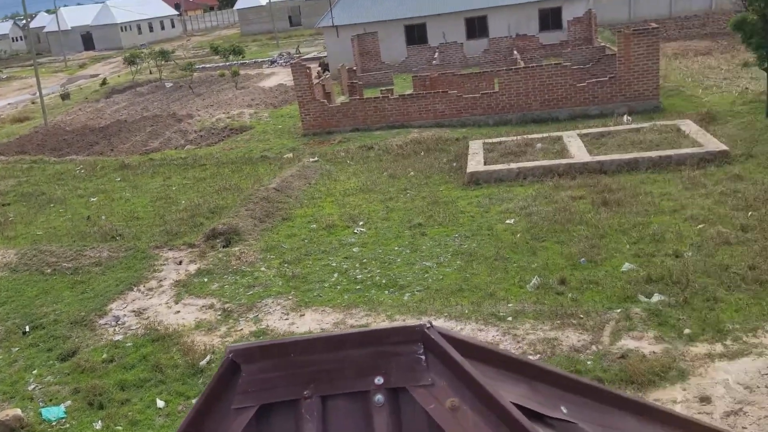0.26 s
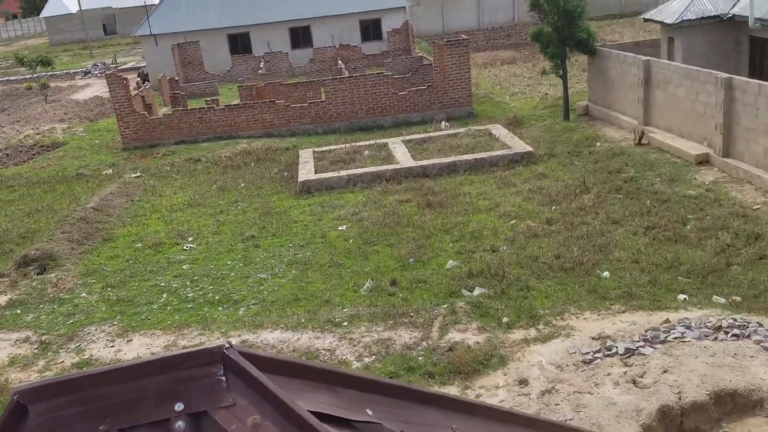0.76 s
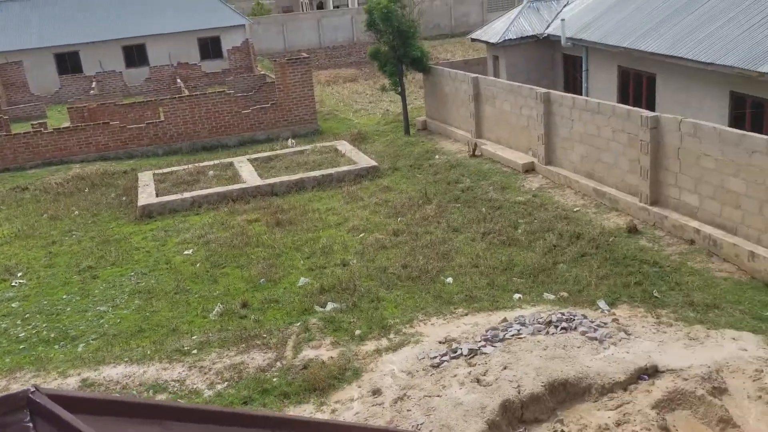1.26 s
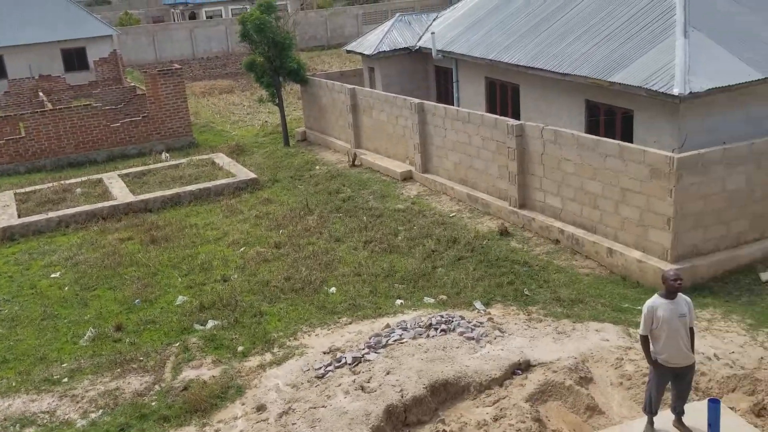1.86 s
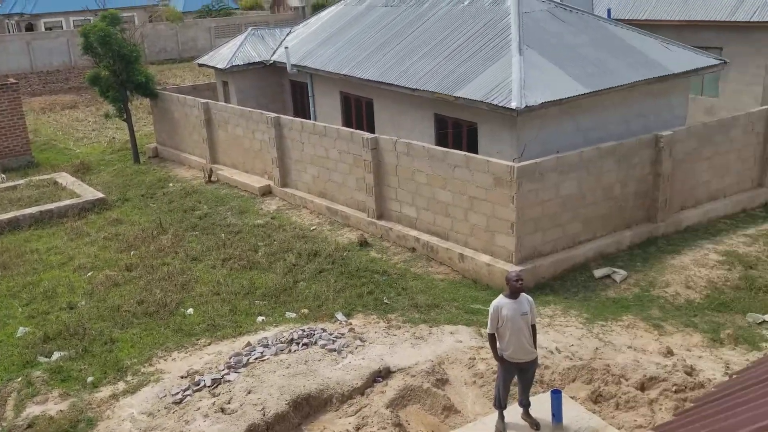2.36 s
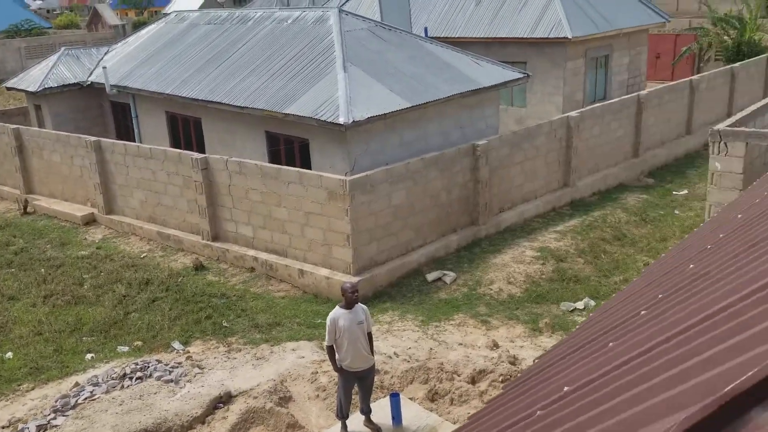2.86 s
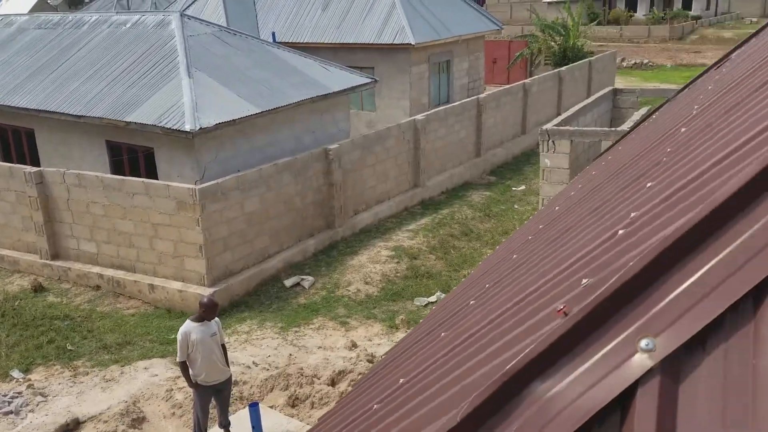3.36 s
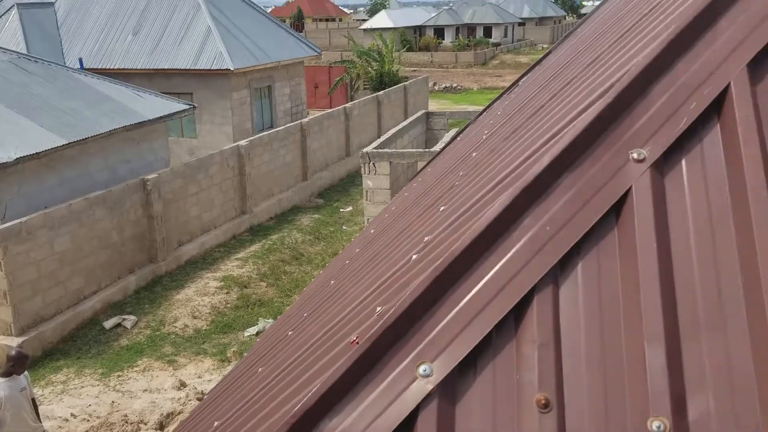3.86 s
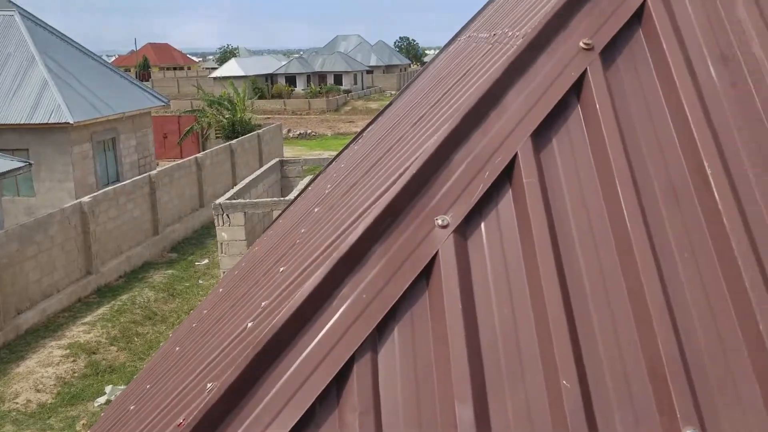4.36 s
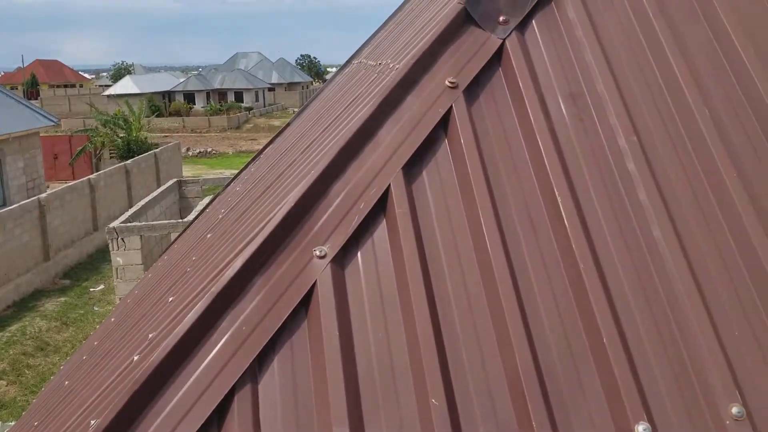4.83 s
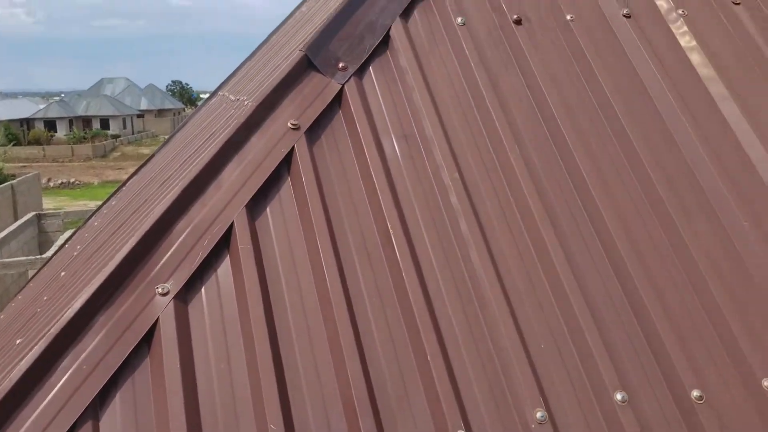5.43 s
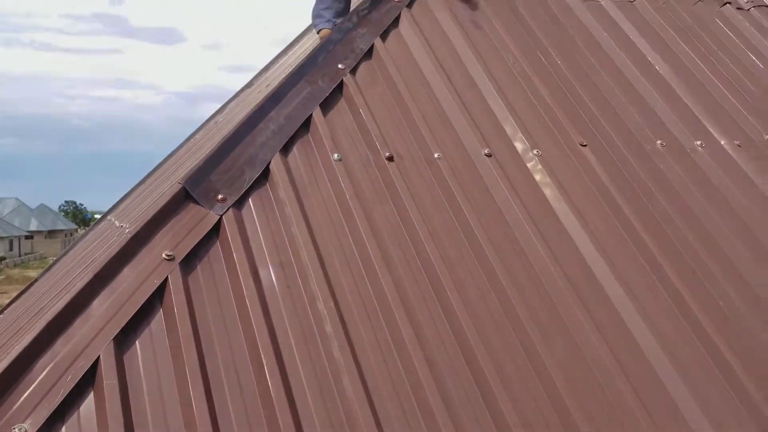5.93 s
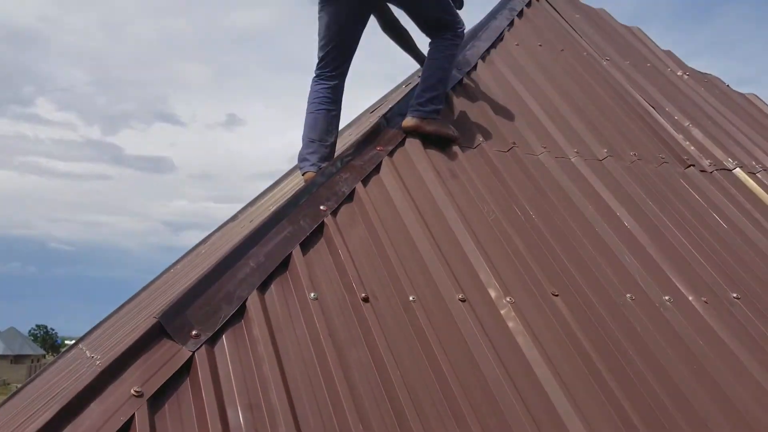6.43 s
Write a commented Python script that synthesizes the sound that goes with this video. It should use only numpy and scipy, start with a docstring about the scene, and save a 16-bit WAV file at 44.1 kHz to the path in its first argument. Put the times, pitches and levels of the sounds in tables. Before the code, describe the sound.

Wind rumbles and pops at the microphone, then steady booming blows ring through a corrugated metal roof, growing close and loud, with brief bird chirps.

```python
"""A gust rumbles and pops on the left port of a hand-held phone while small birds chirp over a quiet plain.
Regular blows (a boot or a hammer) boom through ribbed steel roof sheets, first from the far slope, then close by.
Shaped noise bands make the ringing sheets, the treble dying first; decaying modes make the humming bays, the
dented patches and the ribs. Filtered noise and damped swings make the gust, gliding near-sines the birds."""
import sys
import numpy as np
from scipy import signal
from scipy.fft import irfft, next_fast_len
from scipy.io import wavfile
from scipy.ndimage import uniform_filter1d

SR = 44100
rng = np.random.default_rng(int(sys.argv[2]) if len(sys.argv) > 2 else 0)


def ratio_of_db(decibels):
    """Turn decibels (scalar or array-like) into linear amplitude factors; 0 dB maps to 1."""
    return 10 ** (np.asarray(decibels, float) / 20)


def wrap_up_sound(samples):
    """Save the sound to the file named by the first command line argument, as 16-bit audio."""
    columns = np.atleast_2d(samples).T
    # keep every value between -1 and 1, then stretch to whole-number steps
    tamed = np.clip(columns, -1, 1)
    steps = np.round(tamed * 32767).astype(np.int16)
    wavfile.write(sys.argv[1], SR, steps)


N = 295055
T = np.arange(N) / SR
BANDS_HZ = 28 * 2 ** np.arange(0, 9.3, 1 / 3)

# The blows on the roof; boom and clang are relative to the strength:
# (time [s], strength [dB], boom [dB], clang [dB], ring length [factor])
BLOWS = [(-0.1, -29.5, -9.5, -14, 2.57), (0.651, -33, -58, -11, 0.54), (0.703, -21, -41, -19, 1.45),
         (1.032, -25, -32, -8, 1.32), (1.395, -24.5, -45, -15.5, 1.41), (1.736, -21, -21, -15.5, 1.62),
         (2.133, -17.5, -22.5, -18, 1.71), (2.631, -11.5, -18.5, -15.5, 1.484),
         (3.15, -12, -11.5, -6, 1.146), (3.194, -11, -5.5, -7.5, 0.86), (3.661, -11.5, -11.5, -3, 1.053),
         (4.176, -12, -13.5, -3.5, 0.96), (4.661, -12.5, -14.5, -5.5, 1.036),
         (5.115, -13.5, -14.5, -5, 1.1), (5.582, -13.5, -13, -3, 1.03), (6.077, -12.5, -13, -2.5, 1.03)]


def at(table, hz, column=1):
    """A table column read on a log-frequency axis."""
    table = np.array(table, float)
    return np.interp(np.log(hz), np.log(table[:, 0]), table[:, column])


def walk(rate):
    """A wandering random level: values held for 1 / rate seconds, then slewed twice; spread near 1."""
    hold = int(SR / rate)
    steps = np.repeat(rng.standard_normal(N // hold + 1), hold)
    return 1.3 * uniform_filter1d(uniform_filter1d(steps, hold), hold)[:N]


def ring(x, hz, t60):
    """One decaying mode struck by x; peak near 1 for a unit impulse."""
    pole = np.exp(2j * np.pi * hz / SR - np.log(1000) / (t60 * SR))
    return signal.lfilter([1], [1, -pole], x).imag


def band_noise(hz):
    """Unit-rms noise a third of an octave wide, alike at both ports as far as they are close for that wavelength."""
    # likeness of the two ports: (frequency [Hz], correlation of left and right)
    port_likeness = [(60, .96), (130, .98), (290, .97), (640, .8), (1200, .5), (2200, .2), (3500, 0),
                     (15000, 0)]
    size = next_fast_len(N)
    f = np.arange(size // 2 + 1) * SR / size
    near = np.flatnonzero(np.abs(np.log2((f + 1) / hz)) < 1 / 3)
    like = np.clip(at(port_likeness, hz), -0.98, 0.98)
    taper = np.cos(1.5 * np.pi * np.log2(f[near] / hz))
    mid, side = rng.standard_normal((2, len(near), 2)) @ np.array([1, 1j]) * taper
    both = np.zeros((2, len(f)), complex)
    both[:, near] = np.sqrt(1 + like) * mid + np.sqrt(1 - like) * side * np.array([[1], [-1]])
    x = irfft(both, size)[:, :N]
    return x / x.std()


def whistle(rows, octave_db):
    """A gliding near-sine with soft ends and a weaker octave; rows of (time [s], pitch [Hz], level [dB])."""
    s, hz, db = np.transpose(rows)
    ends = np.clip(np.minimum(T - s[0], s[-1] - T) / 0.002, 0, 1)
    phase = 2 * np.pi * np.cumsum(np.interp(T, s, hz)) / SR
    wave = np.sin(phase) + ratio_of_db(octave_db) * np.sin(2 * phase)
    return np.sqrt(2) * ends * ratio_of_db(np.interp(T, s, db)) * wave


def plain_power():
    """Power of the plain's hush, one row a band: it wavers a little, rises at first and sinks after the middle."""
    # colour of the hush: (frequency [Hz], relative level per Hz [dB])
    hush_colour = [(30, -15), (100, 2.5), (300, -10.5), (600, -16), (1200, -26.5), (2200, -25.5),
                   (3200, -29.5), (4200, -39), (6000, -52), (8000, -51), (11500, -48.5), (16000, -54)]
    # the hush rises, then sinks under the louder blows: (time [s], level [dB])
    hush_course = [(0, -4), (2.9, -0.5), (3.7, -6.5), (6.7, -7.5)]
    total_db = -45.5  # all bands together, before that course
    hush = ratio_of_db(2 * at(hush_colour, BANDS_HZ)) * BANDS_HZ
    hush = hush * ratio_of_db(2 * total_db) / hush.sum()
    level_db = 0.7 * walk(3.6) + np.interp(T, *np.transpose(hush_course))
    return np.outer(hush, ratio_of_db(2 * level_db))


def coo():
    """A soft low note far off that swells quickly and sags as it fades."""
    peak_s, swell_s, fade_s = 0.549, 0.024, 0.075
    hz, sag_hz, db = 432, 38, -49
    return whistle([(peak_s - swell_s, hz, db - 20.5), (peak_s, hz, db),
                    (peak_s + fade_s, hz - sag_hz, db - 4)], octave_db=-17)


def chirp(s, top_hz, db, upper_hz, upper_db):
    """The lower voice slides into a dip, arches up and falls away; the upper one sings a plain arch over it."""
    entry_hz, dip_hz, end_hz = 3500, 2770, 2280
    entry_s, rise_s, fall_s = 0.034, 0.036, 0.044
    u = np.linspace(0, 1, num=12)
    quarter = np.sin(np.pi * u / 2)
    entry = np.c_[s - entry_s * (1 - u),
                  dip_hz + (entry_hz - dip_hz) * (1 - u) ** 1.4,
                  db - 12 * (1 - u) ** 2]
    rise = np.c_[s + rise_s * u,
                 dip_hz + (top_hz - dip_hz) * quarter ** 1.3,
                 db - 1.5 * u]
    fall = np.c_[s + rise_s + fall_s * u,
                 top_hz - (top_hz - end_hz) * quarter ** 1.6,
                 db - 1.5 - 5 * u]
    bow = (2 * u - 1) ** 2
    upper_wait_s, upper_s, upper_sag_hz = 0.008, 0.064, 620
    upper = np.c_[s + upper_wait_s + upper_s * u, upper_hz - upper_sag_hz * bow, upper_db - 8 * bow]
    lower = np.r_[entry, rise[1:], fall[1:]]
    return whistle(lower, octave_db=-62) + whistle(upper, octave_db=-62)


def birds():
    """Quick two-voiced chirps that flutter in level and blur among the walls, and a soft low coo far off."""
    # one row a call: (time of the dip [s], top pitch [Hz], level [dB], upper voice top [Hz], upper voice level [dB])
    calls = [(0.138, 3020, -55.5, 3780, -66), (3.023, 3600, -52.5, 3950, -62),
             (3.142, 3300, -58, 3900, -65), (5.04, 3120, -59.5, 3980, -60.5)]
    chirps = sum(chirp(*call) for call in calls) * ratio_of_db(3.5 * walk(160))
    age = T[:SR // 4]
    walls = rng.standard_normal((2, SR // 4)) * np.exp(-age / 0.08) * ratio_of_db(-37.5) * (age > 0.02)
    blur = signal.fftconvolve(chirps[None], walls)[:, :N]
    # the right port hears the chirps weaker and four samples later
    direct = np.array([ratio_of_db(3.5) * chirps, ratio_of_db(0.5) * np.roll(chirps, 4)])
    return direct + blur + coo()


def wind():
    """Eddies rumble and pop on the left port; the right one is sheltered."""
    # gusts in the rumble: (peak time [s], level [dB], rise [dB/s], fall [dB/s])
    gust_peaks = [(0.044, -20.5, 450, 456), (0.12, -46, 58, 63), (0.275, -19.5, 152, 140),
                  (0.504, -31, 800, 700)]
    # pops, sudden steps of pressure: (time [s], level [dB])
    pops = [(0.037, -18.5), (0.206, -22), (0.258, -17), (0.271, -10.5), (0.284, -6.5), (0.307, -8),
            (0.323, -11.5), (0.355, -14), (0.409, -31), (0.508, -20.5)]
    soft_hz, sharper_hz = 75, 420  # swing of a soft pop; added at full scale, in step with its pressure
    rumble_band = signal.butter(2, [50, 170], "bandpass", fs=SR, output="sos")
    rumble = signal.sosfilt(rumble_band, rng.standard_normal((2, N)))
    gusts = sum(ratio_of_db(db - np.where(T < s, rise * (s - T), fall * (T - s))) for s, db, rise, fall in gust_peaks)
    lull = ratio_of_db(-59.5 - 200 * np.maximum(T - 0.62, 0))  # fades out after 0.62 s
    out = rumble / rumble.std() * (gusts + lull) * ratio_of_db(2.5 * walk(30))
    for s, db in pops:
        hz = soft_hz + sharper_hz * ratio_of_db(db)
        age = np.maximum(T[:SR] - s, 0)
        # the pressure swings back and soon dies away
        out[:, :SR] -= ratio_of_db(db + 1.0) * (age > 0) * np.cos(2 * np.pi * hz * age) * np.exp(-age * hz / 0.48)
    # the port's cavity rounds the steps
    out = signal.sosfilt(signal.butter(3, 520, fs=SR, output="sos"), out)
    # the strongest eddies also hiss faintly
    hiss_band = signal.butter(4, [600, 2800], "bandpass", fs=SR, output="sos")
    hiss = signal.sosfilt(hiss_band, rng.standard_normal((2, N)))
    out = out + ratio_of_db(-27) * hiss * uniform_filter1d(np.abs(out), size=1500)
    return out * ratio_of_db(np.array([[4], [-18]]))


def knocks():
    """A loose sheet taps its purlin: a short ring of a few partials and a dry noise rattle."""
    # the taps: (time [s], level [dB], pitch [Hz], t60 [s])
    taps = [(0.652, -31.5, 430, 0.05), (1.252, -38, 750, 0.05), (3.314, -15.5, 505, 0.026),
            (4.973, -19, 802, 0.026), (6.525, -40, 528, 0.015)]
    # partials of a tap: (pitch ratio, level [dB])
    partials = [(.58, 0.5), (1, 7), (2.199, -3.5)]
    out, age = np.zeros((2, N + SR)), T[:SR // 4]
    rattle_band = signal.butter(3, [500, 2200], "bandpass", fs=SR, output="sos")
    for s, db, hz, t60 in taps:
        tap = sum(ratio_of_db(rel_db) * np.sin(2 * np.pi * hz * ratio * age) for ratio, rel_db in partials)
        tap = tap * 1e-3 ** (age / t60)
        hiss = rng.standard_normal((2, len(age)))
        dry_rattle = ratio_of_db(-6.5) * signal.sosfilt(rattle_band, hiss) * np.exp(-age / 0.052)
        onset = 1 - np.exp(-age / 0.0015)
        start = int(s * SR)
        out[:, start:start + len(age)] += ratio_of_db(db) * (tap + dry_rattle) * onset
    return out[:, :N]


def bay_hum(push, db, length):
    """The spans between purlins hum; each blow lands elsewhere and shares its push anew."""
    # modes of the bays, at ring length 1: (pitch [Hz], level above the strength [dB], t60 [s])
    bay_modes = [(111.2, -20.5, 0.58), (211.3, -25.5, 0.85), (314, -20.5, 0.36), (362, -25.5, 0.93),
                 (430, -34.5, 0.27), (793, -23, 0.54), (1140, -21, 0.48)]
    out = 0
    for hz, bay_db, t60 in bay_modes:
        louder, sharper = rng.standard_normal(2)
        tone = ring(push, hz * (1 + 0.015 * sharper), t60 * length)
        out = out + ratio_of_db(db + bay_db + 3.0 * louder) * tone
    return out


def dent_thud(push, db, boom_db):
    """The patch under the blow thuds, and a neighbouring wall returns the thud."""
    # modes of the patch: (pitch [Hz], level above the strength [dB], t60 [s])
    dent_modes = [(136, -24.5, 0.035), (325, -2.5, 0.092), (910, -11, 0.0083), (1840, -9, .03)]
    wall_echo_s, wall_echo_db = 0.078, -9
    echoed = np.roll(push, int(0.00182 * SR)) + ratio_of_db(wall_echo_db) * np.roll(push, int(wall_echo_s * SR))
    # a blow with little boom is a far one: less of its thud reaches the phone
    near_db = np.interp(boom_db, [-36, -13], [-9, 2])
    out = 0
    for hz, dent_db, t60 in dent_modes:
        louder, sharper = rng.standard_normal(2)
        tone = ring(echoed, hz * (1 + 0.032 * sharper), t60)
        out = out + ratio_of_db(db + dent_db + near_db + 1.5 * louder) * tone
    return out


def rib_tones(push, db, clang_db, length):
    """Each blow wakes nine ribs of its own: short modes at random pitches, levels and delays."""
    out = 0
    for place, size, wait in rng.random((9, 3)):
        tone = ring(np.roll(push, int(wait * 0.023 * SR)), 500 * 4.6 ** place, 0.17 * length)
        ports = np.array([[1], [np.cos(np.pi * place * 1.5)]])  # the right port differs with pitch
        out = out + ratio_of_db(db + place * clang_db - 21 + 15.2 * size) * tone * ports
    return out


def struck_modes():
    """Every blow is one short push that sets the bays, the patch under it and some ribs ringing."""
    out = np.zeros((2, N))
    push = np.zeros(SR // 2)
    push[:24] = np.hanning(24) / 12
    for s, db, boom_db, clang_db, length in BLOWS:
        start = max(int(s * SR), 0)
        here = slice(start, start + len(push))
        out[:, here] += bay_hum(push, db, length)
        # a blow from before the start has no thud left
        if s > 0:
            out[:, here] += dent_thud(push, db, boom_db)
        out[:, here] += rib_tones(push, db, clang_db, length)
    return out * ratio_of_db(np.array([[0.8], [-0.8]]))


def sizzle(clang_db):
    """Top treble of a blow above its strength [dB]; it fades with distance a little faster than the clang."""
    return -24 + 1.283 * clang_db


def sheet_power(hz):
    """Power in one band: each blow builds up, spreads over the roof, then dies on a quick and a slow slope."""
    # where boom, strength, clang and sizzle act: (frequency [Hz] of each)
    colour_hz = (100, 370, 2400, 4600)
    # the sheets, t60 at ring length 1, the late share relative to the first:
    # (frequency [Hz], share per band [dB], first t60 [s], late t60 [s], late share [dB])
    sheet = [(30, -39, 0.47, 0.65, -4), (60.3, -5, 1., 1.7, -8.5), (108, -5, 0.72, 1.97, -2.5),
             (204, -10, 0.64, 1.43, -6), (360, -12.5, 0.64, 1.15, -7), (556, -13, 0.78, 0.76, -8.5),
             (1020, -5.5, 0.48, 0.88, -12), (1820, -8, 0.38, 0.83, -12.5), (2700, -3, 0.33, 0.83, -16),
             (3380, -2, 0.33, 1.1, -16), (3850, 4, 0.25, 0.47, -17.5), (4855, 8, 0.33, 1.46, -27),
             (7980, -13, 0.21, .4, -22.5), (10800, 0.5, 0.21, 0.43, -16), (16000, 3, 0.13, .4, -17)]
    step = 32  # samples between computed points
    share_db, first, late, late_db = (at(sheet, hz, column=c) for c in range(1, 5))
    t = T[::step]
    power = np.zeros(len(t))
    for s, db, boom_db, clang_db, length in BLOWS:
        sizzle_db = sizzle(clang_db)
        colour_db = np.interp(np.log(hz), np.log(colour_hz), [boom_db, 0, clang_db, sizzle_db])
        # every spot struck favours other bands
        colour_db = colour_db + 1.2 * rng.standard_normal()
        # a dull blow is a far one: it arrives by many paths and swells more slowly
        rise = np.interp(sizzle_db, [-48, -38], [0.008, 0.002])
        start = s - 2.1 * rise + 0.0016
        since = t > start
        # the higher the band, the later it starts
        age = np.maximum(t[since] - start - 0.0034 * hz / 10000, 0)
        # far parts of the roof keep feeding the first moments
        held = np.sqrt(age ** 2 + 0.012 ** 2) - 0.016
        quick = 1e-6 ** (held / (first * length))
        slow = ratio_of_db(2 * late_db) * 1e-6 ** (age / (late * length))
        # the bass and middle of a near blow slap hardest in the first moments
        near = np.interp(boom_db, [-34, -18], [0.05, 1])
        slap_db = at([(100, 8.5), (500, 7), (2000, -10.0)], hz)
        slap = 1 + near * ratio_of_db(2 * slap_db) * np.exp(-age / 0.0072)
        build_up = (1 - np.exp(-(age / rise) ** 2 / 3)) ** 2
        power[since] += ratio_of_db(2 * (db + colour_db + share_db)) * build_up * (quick + slow) * slap
    return np.interp(T, t, power)


def roof_and_plain():
    """Every band carries the ringing sheets, which rattle at their laps, over the hush of the plain."""
    # left over right when facing the near slope, before the overall balance: (frequency [Hz], level [dB])
    port_shade = [(60, -1), (200, 0.5), (700, 0.5), (1290, 1.5), (2380, 6.5), (4400, 5.5), (8120, -1),
                  (15000, 2)]
    # how far the phone faces the near slope: (time [s], share of that shade)
    facing_rows = [(0, 0.19), (2.4, 0.18), (3.2, 1.), (6.7, 0.59)]
    facing = np.interp(T, *np.transpose(facing_rows))
    rattle = walk(45)
    clatter = [walk(70) for _ in range(len(BANDS_HZ) // 2 + 2)]
    out = 0
    for k, (hz, hush) in enumerate(zip(BANDS_HZ, plain_power())):
        # neighbouring bands share their lumps
        lumps_db = 1.1 * rattle + 0.9 * (clatter[k // 2] + clatter[(k + 1) // 2])
        level = np.sqrt(sheet_power(hz) * ratio_of_db(2 * lumps_db) + hush)
        shade = ratio_of_db(at(port_shade, hz) * facing / 2)
        out = out + band_noise(hz) * level * np.array([shade, 1 / shade])
    return out


def scene():
    """Roof, wind and birds as the two ports hear them."""
    left_lag = 6  # samples by which the left port hears the roof later
    left_louder_db = 1.0
    left, right = roof_and_plain() + struck_modes() + knocks()
    left = ratio_of_db(left_louder_db / 2) * np.roll(left, left_lag)
    right = ratio_of_db(-left_louder_db / 2) * right
    return np.array([left, right]) + wind() + birds()


def low_pass(x):
    """Removes everything above the highest recorded frequency."""
    return signal.sosfilt(signal.butter(12, 16980, fs=SR, output="sos"), x)


def record(dry):
    """The phone rounds the loudest peaks and cuts the top."""
    rounded = np.tanh(0.92 * dry) / 0.91
    top_cut = signal.ellip(8, 0.2, 70, 15750, fs=SR, output="sos")  # low-pass at 15750 Hz
    mix = signal.sosfilt(top_cut, rounded)
    return low_pass(mix)


dry = scene()
out = record(dry)
wrap_up_sound(out)
```